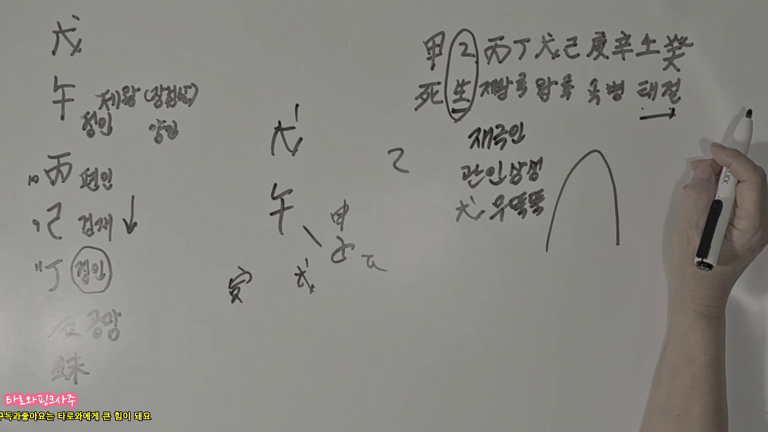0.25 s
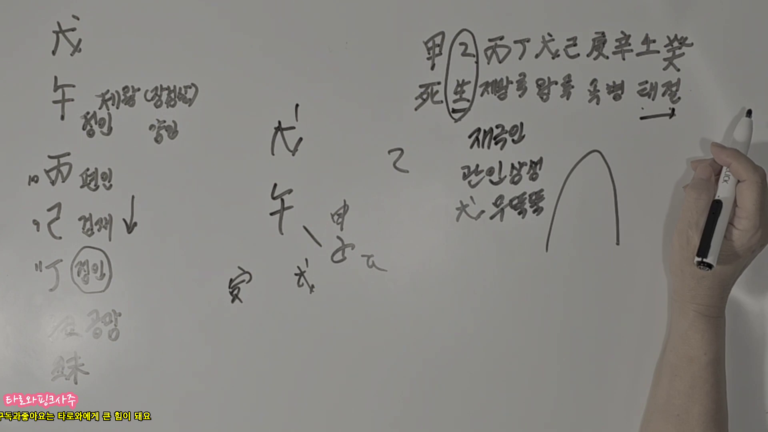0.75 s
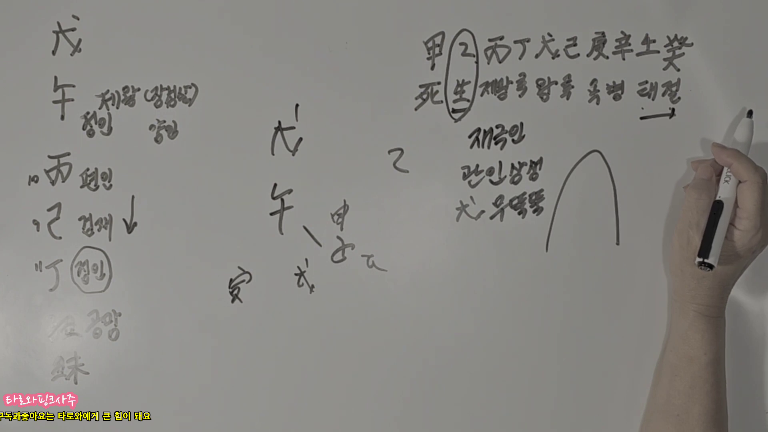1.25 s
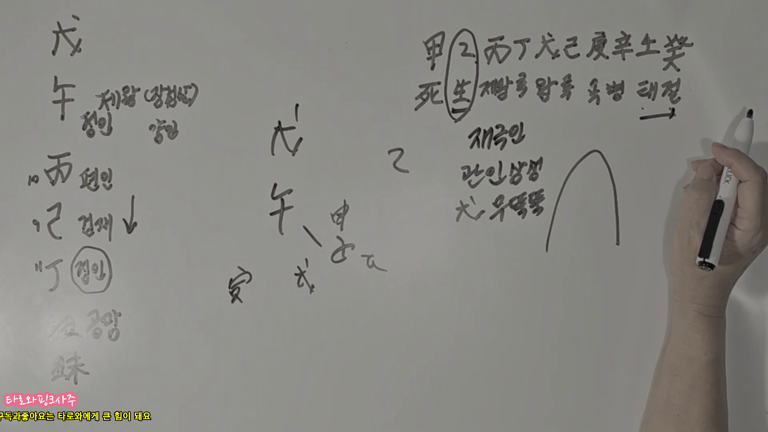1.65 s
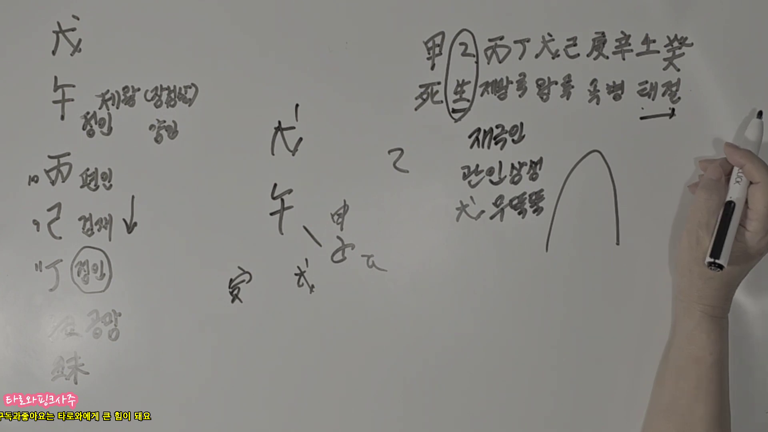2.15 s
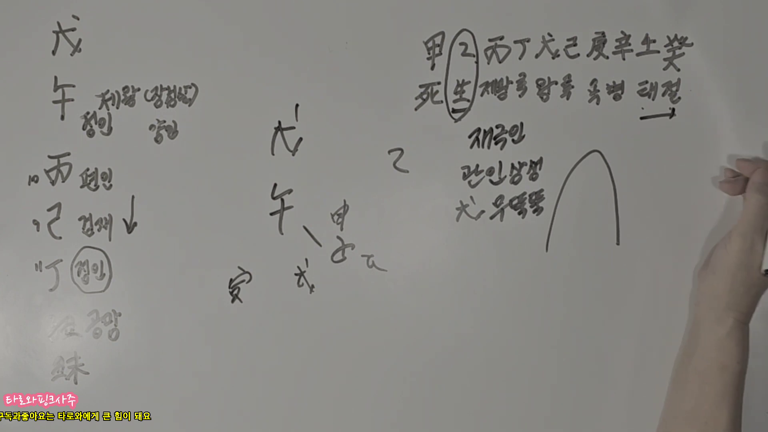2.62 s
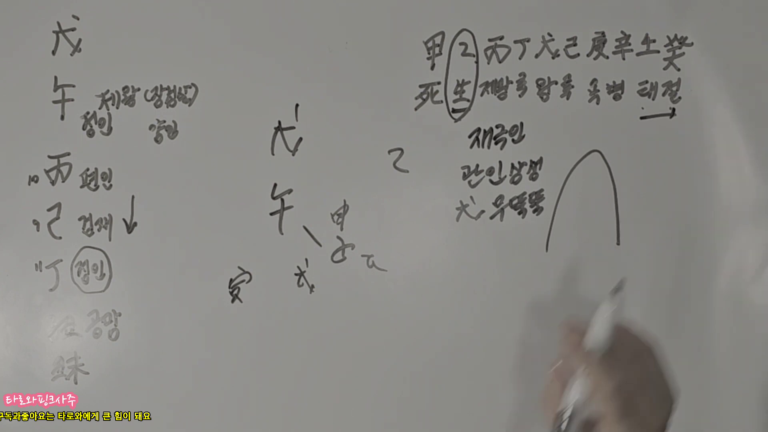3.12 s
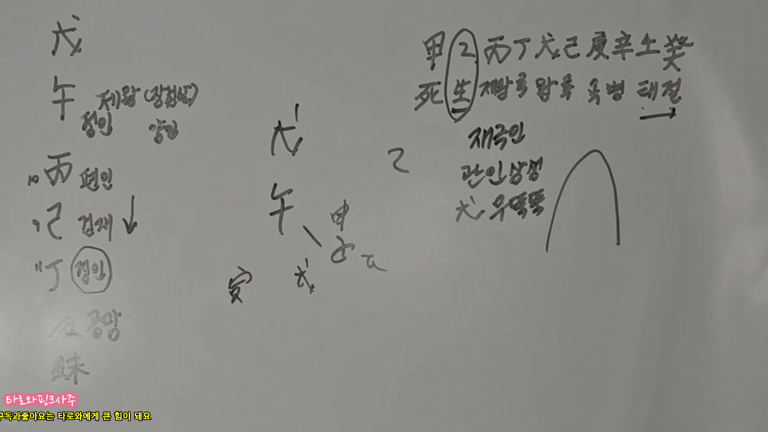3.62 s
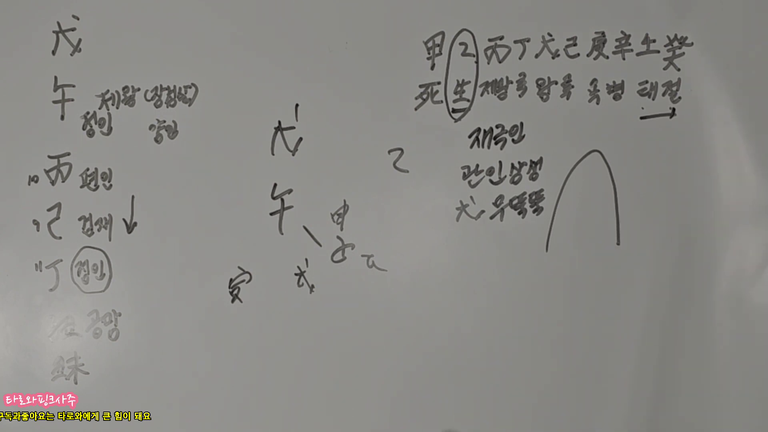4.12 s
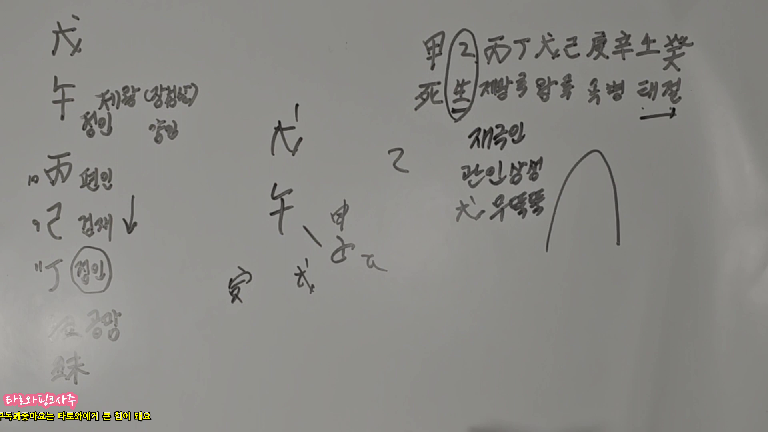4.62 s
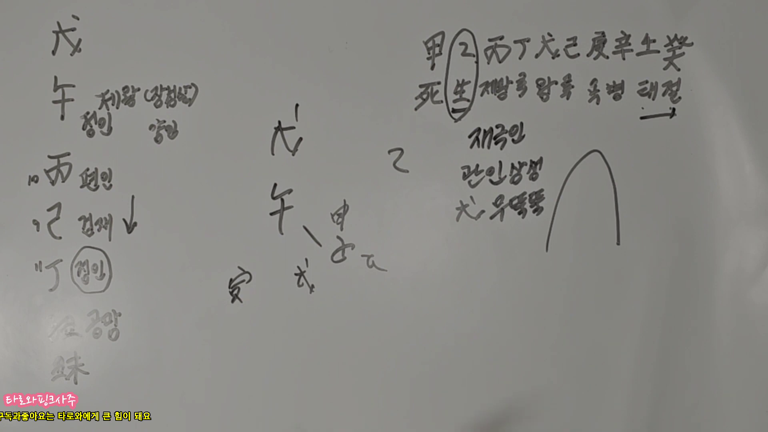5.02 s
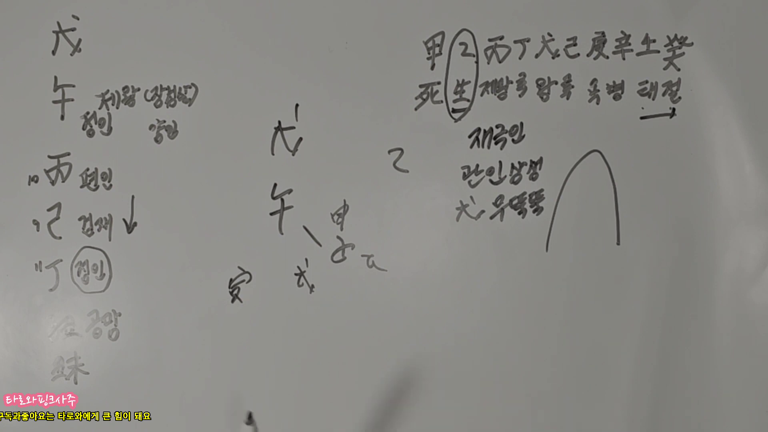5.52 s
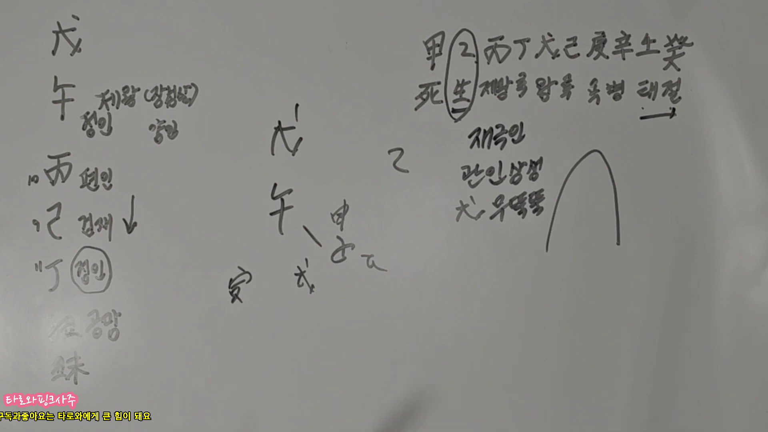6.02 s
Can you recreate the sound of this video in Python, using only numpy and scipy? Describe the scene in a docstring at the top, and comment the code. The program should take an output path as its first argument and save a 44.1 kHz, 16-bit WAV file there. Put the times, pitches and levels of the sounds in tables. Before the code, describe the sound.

A close, hissing microphone picks up a gently pulsing motor hum in a small room. A light knock and a click come first, then a short swish of skin across a whiteboard, ending with a low thump of the panel. Scattered light knocks and hollow plastic marker taps follow, with faint brushes of cloth. Finally a dull rub with a slight squeak swells along the board's edge.

```python
"""A small quiet room with a whiteboard, heard through a hissing mono microphone close by.
A hand wipes down the board, skin hissing and panel drumming, and comes off with a knock and a thump.
A hollow plastic marker and other small things tap and scrape below, a sleeve swishes, and a duller,
faintly squeaky rub starts along the lower edge. Three motors hum and slowly beat over an air rumble."""
import sys
import numpy as np
from scipy import signal
from scipy.fft import rfft, irfft
from scipy.io import wavfile
from scipy.ndimage import uniform_filter1d

SR = 44100
rng = np.random.default_rng(int(sys.argv[2]) if len(sys.argv) > 2 else 0)


def log_audio(samples):
    """Write samples as a 16-bit WAV file to the path given in sys.argv[1]."""
    # one column per channel
    frames = np.atleast_2d(samples).T
    # limit to full scale, then quantise
    limited = np.clip(frames, -1, 1)
    pcm = np.round(limited * 32767).astype(np.int16)
    wavfile.write(sys.argv[1], SR, pcm)


N = 276066
T = np.arange(N) / SR


def wipe(judder_db=0.7, panel_trim_db=-1):
    """A hand sweeps the board: fine slips of skin hiss, coarser ones drum the panel, and both judder."""
    # The sweep. Each row: time in seconds, skin level in dB, panel level in dB before its trim.
    sweep = [(2.53, -63.5, -69), (2.63, -46, -57), (2.676, -51, -55), (2.746, -47.5, -52),
             (2.782, -43, -44), (2.802, -50, -53), (2.808, -49.5, -45.5), (2.838, -47.5, -52),
             (2.87, -44, -51.5), (2.882, -38.5, -40), (2.9, -60, -60)]
    # A last graze as the hand lifts. Each row: peak time in seconds, level in dB, half length in seconds.
    grazes = [(2.98, -55, 0.03)]
    # The two friction colours. Each row: frequency in Hz, relative level in dB.
    skin_colour = [(1200, -4.5), (2600, 0), (4200, -1.5), (7000, 0), (9500, -7), (13000, -10.5),
                   (16000, -18)]
    panel_colour = [(200, 1), (330, 7), (480, 0), (700, 1), (850, -3), (1020, -5), (1350, 3), (1600, -1.5),
                    (2050, 2), (2700, -18), (5000, -18)]
    skin_gain, panel_gain = (gain + swells(grazes) for gain in gains(sweep))
    skin = skin_gain * colour(slips(per_second=12000, scatter_db=1.25), skin_colour)
    panel = panel_gain * colour(slips(per_second=4000, scatter_db=1.0), panel_colour)
    return (skin + undb(panel_trim_db) * panel) * undb(judder_db * walk(90))


def knocks():
    """Knocks on the board set its panel ringing."""
    # Each row: start in seconds, level in dB, centre in Hz, spread in octaves, contact decay in seconds.
    hits = [(1.014, -46.5, 453, 0.24, 0.02), (2.648, -49, 637, .6, .0088),
            (2.809, -41.5, 1630, 0.45, 0.0022), (2.883, -39.5, 684, 0.41, 0.0012),
            (3.478, -46, 690, 0.56, .007), (3.572, -47.5, 1100, 2.4, .015),
            (3.741, -53.5, 1000, 0.99, 0.0065), (3.892, -52.5, 740, 0.61, .0017),
            (4.282, -54, 1010, 0.7, .0046), (5.246, -45, 800, 1.05, 0.0041)]
    # The board's modes. Each row: frequency in Hz, relative level in dB, T60 in seconds.
    board_modes = [(440, 0, 0.057), (692, 2, 0.054), (795, 0, .05), (1285, -3, 0.14), (1390, -12, 0.056),
                   (1920, -6.5, 0.096), (2175, 1, .06), (2290, 3, 0.062)]
    return blows(hits, board_modes, hardness=13, ring_db=-9)


def thumps():
    """The whole panel flexes through a few slow swings when pushed or let go."""
    # Each row: start in seconds, peak level in dB, pitch in Hz, length in seconds.
    flexes = [(2.874, -37, 131, 0.019), (2.881, -31, 230, 0.0063), (2.954, -29, 90, 0.024),
              (2.972, -36, 58, .06)]
    out = np.zeros(N)
    for start, db, hz, length in flexes:
        t = T[:int(length * SR)]
        arch = np.sin(np.pi * t / length)
        add(out, start, undb(db) * arch * np.sin(2 * np.pi * hz * t))
    return out


def marker_taps():
    """Taps and scrapes ring briefly in the marker's hollow plastic barrel."""
    # Each row: start in seconds, level in dB, centre in Hz, spread in octaves, contact decay in seconds.
    taps = [(1.014, -55, 2200, 0.58, .003), (2.317, -44, 4270, 1.5, 0.012), (2.974, -46, 5500, 0.7, 0.0071),
            (3.011, -54, 4500, 1.1, .002), (3.371, -53, 2200, 0.92, .0091), (3.425, -44, 4460, 1.1, 0.018),
            (3.474, -42.5, 1350, 1.0, 0.016), (3.506, -51, 1200, 1.2, 0.0055),
            (3.889, -46, 3300, .94, 0.0085), (3.905, -51, 2300, 0.72, .018),
            (4.050, -41.5, 1880, 1.01, 0.0059), (4.064, -48.5, 1600, 0.3, 0.0091),
            (4.195, -50.5, 1100, 1.7, .025), (4.324, -54, 5000, 0.7, .003)]
    # The barrel's modes. Each row: frequency in Hz, relative level in dB, T60 in seconds.
    barrel_modes = [(974, 2.5, 0.027), (1160, 4, 0.019), (1524, -2, 0.026), (1850, -11, 0.046),
                    (2700, -3, .028), (4290, 0, 0.022), (4940, -3, 0.016)]
    return blows(taps, barrel_modes, hardness=5.5, ring_db=-11)


def edge_rub(judder_db=1.2):
    """A soft drag along the lower edge, in a few pushes, that squeaks a little."""
    # Each row: peak time in seconds, level in dB, half length in seconds.
    pushes = [(5.885, -55.5, .06), (6.14, -58.5, 0.065), (6.21, -48, .025), (6.249, -39.5, .018)]
    # The edge's narrow resonances. Each row: frequency in Hz, relative level in dB, T60 in seconds.
    squeak_modes = [(1304, -2, 0.067), (1926, -1, 0.059), (2080, 0, .05), (2350, -5, .07), (2700, -6, .04),
                    (5900, 0, .05)]
    # The rub's dull colour. Each row: frequency in Hz, relative level in dB.
    edge_colour = [(150, -6), (330, 8), (460, 4.5), (620, -8), (900, -12), (1300, -8), (1650, -6),
                   (1950, -4), (2300, -3), (2600, -11.5), (3500, -17), (6000, -19), (10000, -26),
                   (15000, -22)]
    drag = body(slips(per_second=4600, scatter_db=0.5), squeak_modes, ring_db=-13)
    return swells(pushes) * colour(drag, edge_colour) * undb(judder_db * walk(70))


def sleeve_swishes():
    """Cloth brushes past, swelling and fading evenly."""
    # Each row: peak time in seconds, level in dB, half length in seconds.
    strokes = [(3.455, -52, 0.011), (4.53, -56.5, .02), (6.071, -48.5, 0.013)]
    # The cloth's bright colour. Each row: frequency in Hz, relative level in dB.
    cloth_colour = [(1500, -10), (3400, 2), (4600, 4.5), (7000, 3.5), (12000, 5), (15000, -2)]
    return swells(strokes) * colour(slips(per_second=8000, scatter_db=0), cloth_colour)


def motor_hum(waver_rad=0.088, trim_db=0.07):
    """Three motors near 58.6 turns a second drift in and out of step, so their low tones beat."""
    # The strongest tone near each harmonic. Each row: frequency in Hz, level in dB before the trim.
    tones = [(58.51, -47), (117.0, -49.2), (176.68, -52.8), (234.42, -45.5), (293.3, -72), (351.7, -66.5)]
    # The other motors' tones, just above those. Each row: harmonic number, beat rate in Hz,
    # level in dB before the trim, time of one crest in seconds.
    beats = [(1, .116, -56.6, 3.3), (1, .37, -54.1, 2.29), (2, .21, -53.3, 1.7), (2, .78, -52.2, .23),
             (4, 1.162, -55.9, .3)]
    out = np.zeros(N)
    for harmonic, (hz, db) in enumerate(tones, 1):
        others = sum(undb(level) * np.exp(2j * np.pi * beat_hz * (T - crest))
                     for number, beat_hz, level, crest in beats if number == harmonic)
        phase = 2 * np.pi * (hz * T + rng.random()) + waver_rad * walk(3)
        out += np.imag((undb(db) + others) * np.exp(1j * phase))
    return np.sqrt(2) * undb(trim_db) * out


def rumble_and_hiss(rumble_db=-47, hiss_db=-55.5):
    """Steady air rumble under even microphone hiss."""
    # The two noise colours. Each row: frequency in Hz, relative level in dB.
    rumble_colour = [(18, -23), (31, -18), (43, -3.5), (80, 0), (100, -2), (150, -2), (200, -5),
                     (290, -8.5), (400, -17), (600, -25.5), (1000, -34.5), (2000, -48.5)]
    hiss_colour = [(300, -12), (850, 2), (1100, -0.5), (1400, 1.5), (1750, -2), (2150, -2.5), (2900, 1),
                   (5500, 1), (9000, -0.5), (15800, -1)]
    rumble = undb(rumble_db) * colour(rng.standard_normal(N), rumble_colour)
    return rumble + undb(hiss_db) * colour(rng.standard_normal(N), hiss_colour)


def wide_hiss(level_db=-77.5):
    """A faint top hiss that gives a trace of width."""
    # Its colour. Each row: frequency in Hz, relative level in dB.
    top_colour = [(2600, -40), (3800, -19), (8000, -8), (14000, 11.5)]
    return undb(level_db) * colour(rng.standard_normal(N), top_colour)


def room(x, t60_s=0.3, tail_db=-15):
    """The near walls add a short diffuse tail, duller than the direct sound."""
    t = T[:SR // 2]
    tail = colour(rng.standard_normal(len(t)), [(300, 2), (3000, 1), (14000, -23)])
    tail *= np.exp(-np.log(1000) * t / t60_s) * (t > .004)
    return x + undb(tail_db) * signal.fftconvolve(x, tail / np.linalg.norm(tail))[:N]


def blows(table, modes, hardness, ring_db, blunt_s=0.0076, fade_in_share=0.21):
    """Each blow is a tick and a dying chatter; the size of the contact picks the band that answers."""
    out, t = np.zeros(N), T[:SR // 5]
    f = np.maximum(np.fft.rfftfreq(len(t), 1 / SR), 1)
    lead = SR // 200
    for start, db, hz, octaves, decay in table:
        fade_in = 1 - np.exp(-t / (fade_in_share * decay))
        contact = rng.standard_normal(len(t)) * np.exp(-t / decay) * fade_in
        contact[0] += hardness * np.exp(-decay / blunt_s)  # long, blunt contacts lose the tick
        band = (1 + (np.log2(f / hz) / octaves) ** 8) ** -.5
        force = irfft(rfft(np.roll(contact, lead)) * band, len(t))
        blow = body(force, modes, ring_db)
        # the level is the rms of the blow's energy packed into 5 ms
        add(out, start - lead / SR, undb(db) * np.sqrt(lead) * blow / np.linalg.norm(blow))
    return out


def body(force, modes, ring_db):
    """The contact noise itself plus the modes that it sets ringing."""
    t = T[:SR // 4]
    ring = sum(undb(db) * np.cos(2 * np.pi * hz * t) * np.exp(-np.log(1000) * t / t60)
               for hz, db, t60 in modes)
    return force + undb(ring_db) * signal.fftconvolve(force, ring / np.linalg.norm(ring))[:len(force)]


def slips(per_second, scatter_db):
    """Dense tiny slips of one surface on another; scatter makes a few stand out."""
    happens = rng.random(N) < per_second / SR
    return unit(happens * rng.standard_normal(N) * undb(scatter_db * rng.exponential(size=N)))


def swells(table):
    """Gain of strokes that gather speed and slow down again evenly."""
    return np.sqrt(sum(undb(db) ** 2 * np.exp(-((T - peak) / half) ** 2) for peak, db, half in table))


def gains(table):
    """One gain curve for each dB column, silent outside the table's times."""
    times, *columns = np.transpose(table)
    return [undb(np.interp(T, times, db, left=-120, right=-120)) for db in columns]


def colour(x, points):
    """Shape a spectrum with (Hz, dB) points, at rms 1."""
    hz, db = np.transpose(points)
    f = np.maximum(np.fft.rfftfreq(len(x), 1 / SR), 1)
    curve = undb(np.interp(np.log(f), np.log(hz), db))
    return unit(irfft(rfft(x) * curve, len(x)))


def walk(rate_hz):
    """A smooth random wander with a spread near 1."""
    hold = int(SR / rate_hz)
    steps = np.repeat(rng.standard_normal(N // hold + 1), hold)
    return 1.43 * uniform_filter1d(uniform_filter1d(steps, hold), hold)[:N]


def add(out, start_s, sound):
    """Mix a short sound in."""
    i = int(start_s * SR)
    out[i:i + len(sound)] += sound[:N - i]


def undb(db):
    """Decibels to gain."""
    return 10 ** (np.asarray(db) / 20)


def unit(x):
    """Scale to rms 1."""
    return x / np.sqrt(np.mean(x ** 2))


def scene():
    """All sources reach one microphone and sit in the centre; only a trace of hiss is wide."""
    hits = knocks() + marker_taps()
    handling = room(wipe() + edge_rub() + sleeve_swishes() + hits + thumps())
    mono = handling + motor_hum() + rumble_and_hiss()
    side = wide_hiss()
    return np.array([mono + side, mono - side])


def record(dry):
    """A steep low-pass cuts the very top of the treble."""
    top_hz = 15850
    return signal.sosfilt(signal.ellip(12, .1, 80, top_hz, fs=SR, output="sos"), dry)


dry = scene()
out = record(dry)
log_audio(out)
```